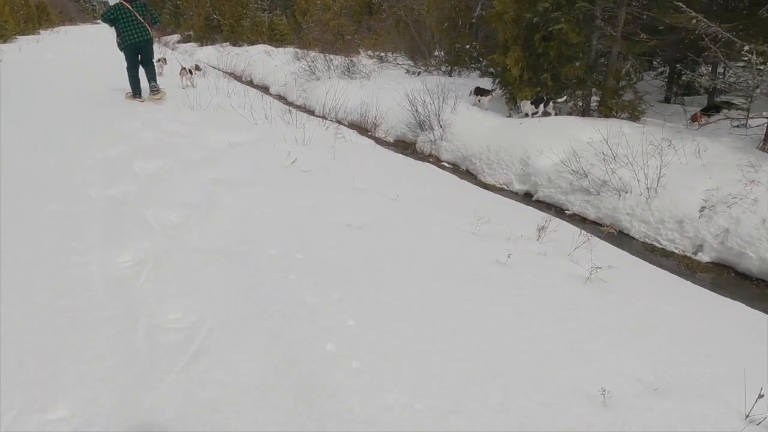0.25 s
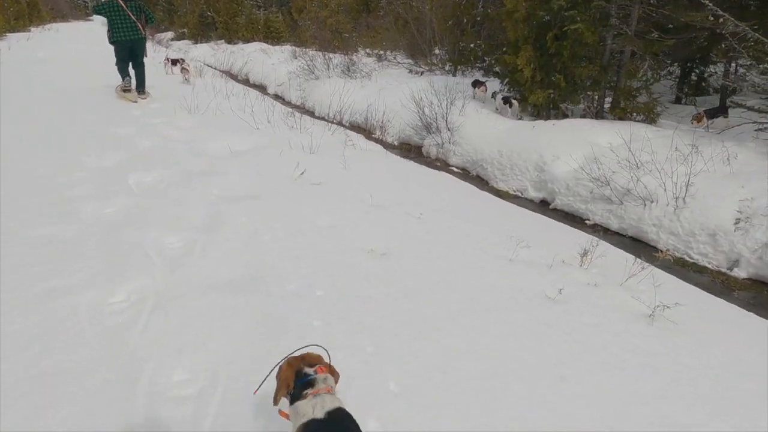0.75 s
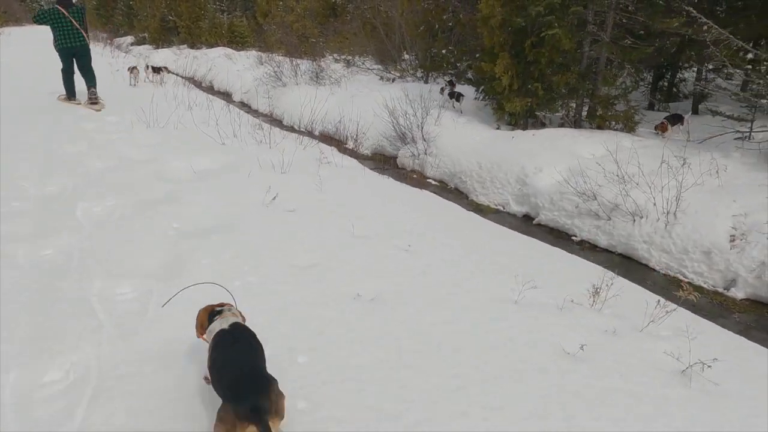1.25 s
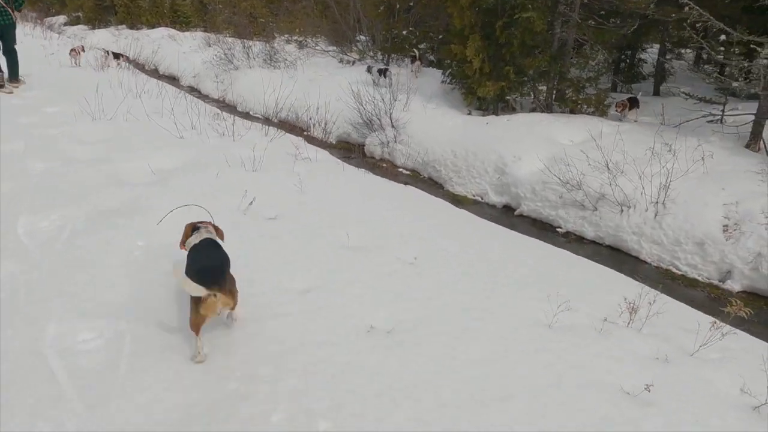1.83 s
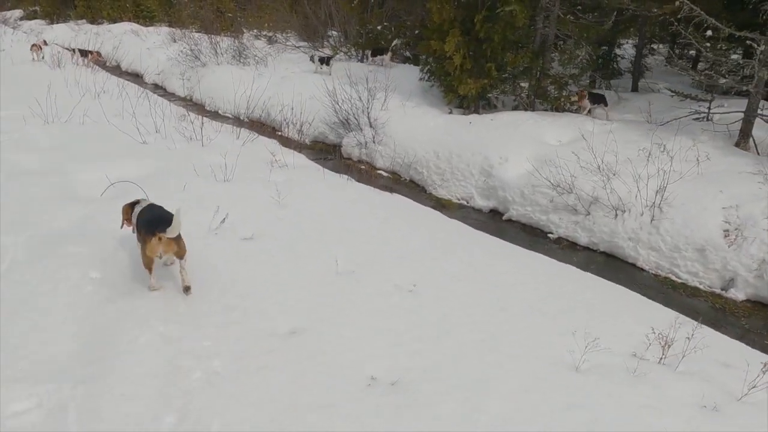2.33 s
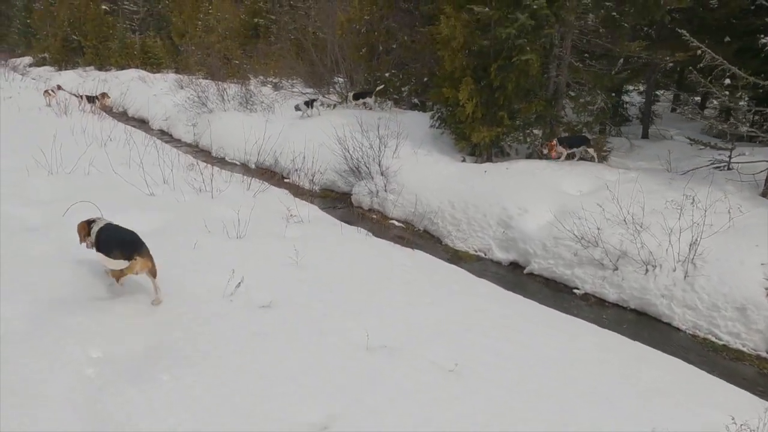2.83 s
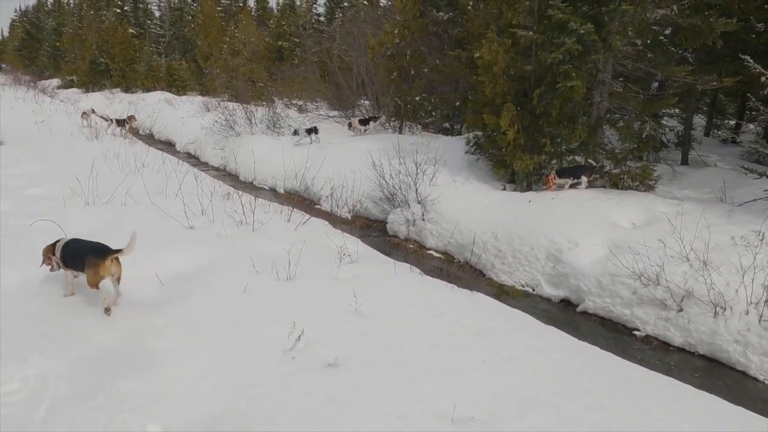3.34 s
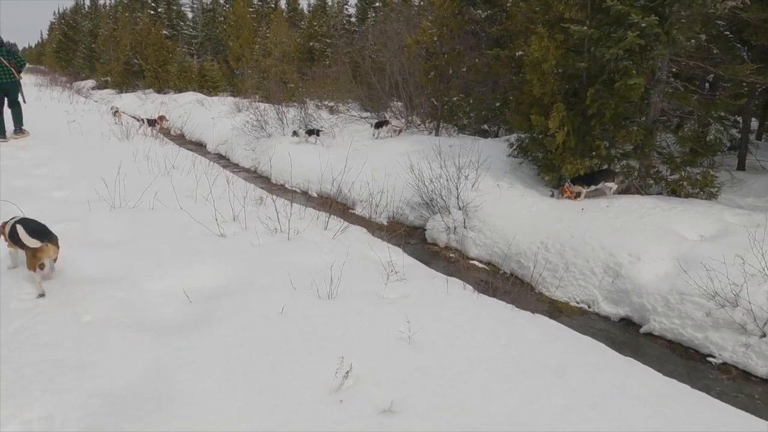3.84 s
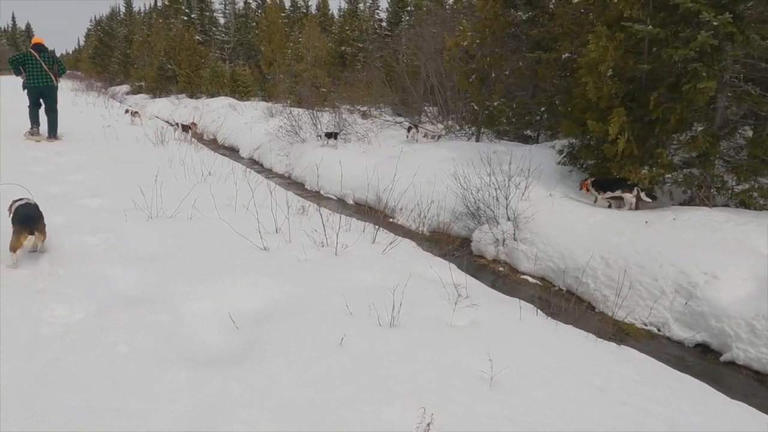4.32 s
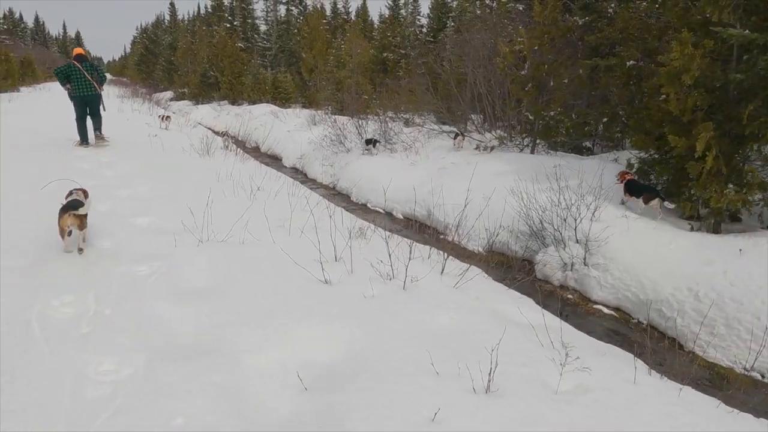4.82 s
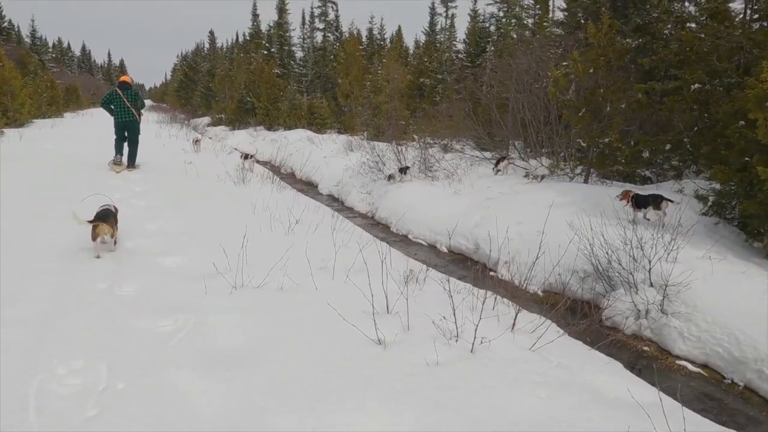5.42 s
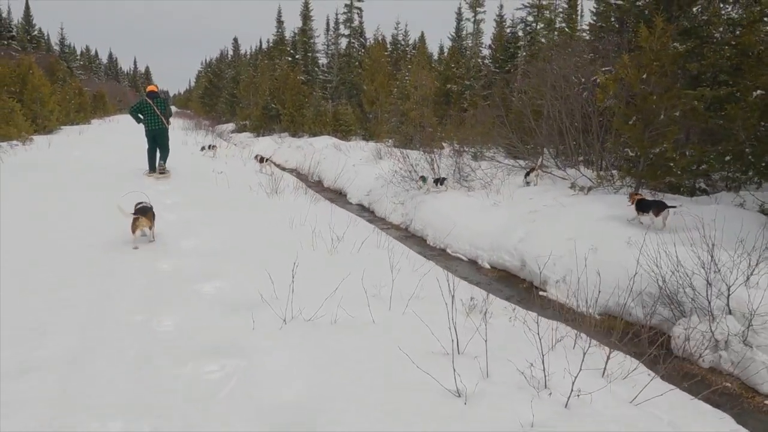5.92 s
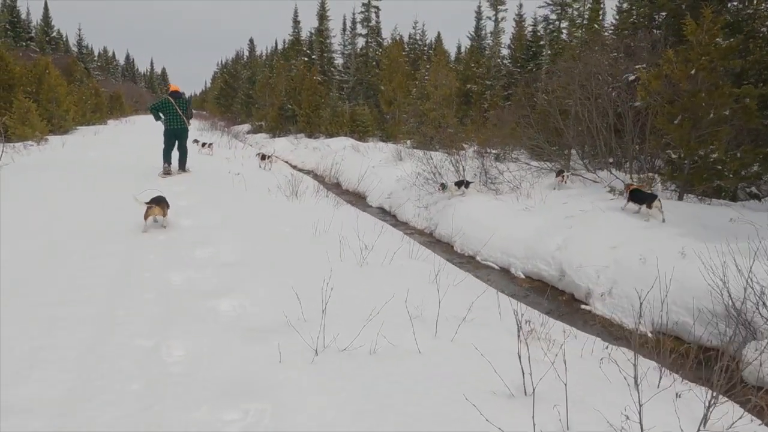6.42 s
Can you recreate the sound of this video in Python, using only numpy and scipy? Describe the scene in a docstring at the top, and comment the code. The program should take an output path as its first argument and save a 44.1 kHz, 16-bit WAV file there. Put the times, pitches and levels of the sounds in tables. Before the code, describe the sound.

Small bells jingle on trotting dogs over crunching snowshoe steps, with a light wind rumble and quiet forest air.

```python
"""From the start, snowshoes crunch, scuff and snap through crusted snow under a hand-held camera, while
light wind buffets both microphone ports over a forest hush. Clappers jingle in the collar bells of
trotting dogs: one close by, a faint pack running off, and from about 2 s a second small bell.
The packed snow squeaks twice, near 1.6 and 4.9 s. From 5.5 s the camera folds its two channels
into one, duller sound."""
import sys
import numpy as np
from scipy import signal
from scipy.fft import rfft, irfft, next_fast_len
from scipy.io import wavfile
from scipy.ndimage import uniform_filter1d, map_coordinates

SR = 44100
rng = np.random.default_rng(int(sys.argv[2]) if len(sys.argv) > 2 else 0)


def store_pcm(level_fs):
    """Save levels as 16-bit WAV."""
    pcm = np.round(np.clip(level_fs, -1, 1) * 32767).astype(np.int16)
    wavfile.write(sys.argv[1], SR, np.atleast_2d(pcm).T)


N = 293946

# tone of breaking crust: (frequency [Hz], spectrum level [dB])
CRUST_SPECTRUM = [(47, -4.5), (80, 1.5), (280, -1), (486, -4), (843, -6.5), (1050, -3), (1780, -5.5),
                  (2480, -11), (3050, -10), (4000, -7), (5470, -6.5), (10800, -31), (12900, -43.5),
                  (15400, -63)]
# main modes of the near bell and the pack's: (frequency [Hz], t60 [s], left minus right [dB])
COLLAR_MODES = [(1801.5, 0.35, -3), (4117, 0.47, 3), (5336, 0.17, 9), (6295, 0.19, -1.5), (5590, 0.15, 2.5)]
# fainter modes that ring along: (main mode [index], frequency [Hz], relative level [dB])
COLLAR_PARTIALS = [(2, 5552, -3), (4, 7365, -8), (4, 4160, -5), (4, 10010, -14), (4, 9150, -20),
                   (4, 3634, -12), (4, 13990, -33), (1, 9512, -24), (1, 10400, -27), (1, 11930, -31)]


def amp(db):
    return 10 ** (np.asarray(db) / 20)


def unit(x):
    return x / np.sqrt(np.mean(x ** 2) + 1e-20)


def along(points, hz):
    """Read (frequency [Hz], value) points on a log axis."""
    f, v = np.transpose(points)
    return np.interp(np.log(hz + 1), np.log(f + 1), v)


def curves(rows):
    """One value per sample for each column after the time."""
    s, *cols = np.transpose(rows)
    return [np.interp(np.arange(N) / SR, s, c) for c in cols]


def wobble(rate):
    """A smooth random curve, rate knots a second."""
    return map_coordinates(rng.standard_normal(int(N * rate / SR) + 4), [np.arange(N) * rate / SR])


def filtered(x, response):
    """Shape x with a complex frequency response."""
    m = next_fast_len(N + SR // 2)
    return irfft(rfft(x, m) * response(np.fft.rfftfreq(m, 1 / SR)), m)[..., :N]


def above(hz, edge_hz):
    """Gain of a soft high-pass."""
    return 1 / np.sqrt(1 + (edge_hz / (hz + 1)) ** 8)


def spread(pair, width_db):
    """A direct sound and its scattered twin reach two ports a finger apart."""
    likeness = [(100, 1), (400, 0.97), (700, 0.85), (1500, 0.77), (5000, 0.17), (8500, 0.99), (12000, 1)]  # how alike the ports sound: (frequency [Hz], correlation [0-1])
    balance = [(300, -1), (800, 2), (1500, 1), (3000, 3), (6000, 7.5), (9000, 0.5)]  # how the image leans: (frequency [Hz], left minus right [dB])
    angle = lambda hz: np.arccos(np.clip(along(likeness, hz), -1, 1)) / 2
    mid, side = filtered(pair, lambda hz: np.array([np.cos(angle(hz)), np.sin(angle(hz))]))
    side = side * amp(width_db)
    # below the top treble, the left port hears a sample later than the right
    lag = lambda hz: np.exp(-1j * np.pi * hz / SR * (1 - above(hz, 11300)))
    left = lambda hz: amp(along(balance, hz) / 2) * lag(hz)
    return filtered(np.array([mid + side, mid - side]), lambda hz: np.array([left(hz), 1 / left(hz)]))


def air():
    """A quiet, wide bed of forest and stream rustle."""
    spectrum = [(100, 5.5), (800, -5.5), (1500, -41), (2800, -20), (5000, -4.5), (9000, -17.5),
                (14000, -35), (15500, -101)]  # low murmur and high hiss: (frequency [Hz], spectrum level [dB])
    rustle = unit(filtered(rng.standard_normal((2, N)), lambda hz: amp(along(spectrum, hz))))
    return amp(-48.5) * spread(rustle, width_db=12.0)


def wind():
    """Lumpy buffeting, partly shared by the ports and stronger on the right."""
    gusts = [(0.0, -61), (0.28, -27), (0.61, -34), (0.76, -40.5), (0.8, -22.5), (1.24, -54), (1.43, -35.5),
             (2.11, -41.5), (2.78, -53.5), (2.99, -28), (3.15, -38.5), (4.15, -37.5), (4.21, -24.5),
             (4.47, -38.5), (6.55, -46)]  # push of the wind: (time [s], level [dB])
    spectrum = [(12, -28), (25, 2), (45, 3), (90, -6), (200, -20.5), (400, -62)]  # rumble at the ports: (frequency [Hz], spectrum level [dB])
    shared, own = rng.standard_normal(N), rng.standard_normal((2, N))
    rumble = unit(filtered(shared + 1.3 * own, lambda hz: amp(along(spectrum, hz))))
    return amp(curves(gusts)[0] + 3.0 * wobble(12) + np.array([[-2.6], [1.6]])) * rumble


def bell(blows, modes, partials, click_db):
    """Each clapper blow clicks, muffles the old ring and restarts every mode, a little off pitch."""
    parents = [round(k) for k, _, _ in partials]
    faint_modes = [(f, 1.17 * modes[k][1] * min(1, 7000 / f) ** 2.3, modes[k][2])
                   for k, (_, f, _) in zip(parents, partials)]
    hz, t60, pan_db = np.transpose(modes + faint_modes)[..., None]
    muffle_db = 4 * (hz / 4000) ** 1.3  # a new blow takes most from the high modes
    chance = rng.standard_normal((len(blows), 4, len(hz), 1))
    starts = [round(row[0] * SR) for row in blows] + [N]
    rattle = np.array([wobble(160) for _ in hz])  # the loose clapper and the collar brush the metal
    ring, click_env = np.zeros((2, N)), np.zeros(N)
    tail_db = np.full(hz.shape, -120.)
    for (_, *db), start, end, (phase, detune, scatter, beat) in zip(blows, starts, starts[1:], chance):
        t = np.arange(min(end - start, SR // 3)) / SR
        span = slice(start, start + len(t))
        blow_db = np.array(db + [db[k] + rel for k, (_, _, rel) in zip(parents, partials)])[:, None]
        blow_db[len(db):] -= 4 * np.abs(scatter[len(db):])
        level_db = 10 * np.log10(amp(2 * blow_db) + amp(2 * (tail_db - muffle_db)))
        tail_db = level_db - 60 * (end - start) / SR / t60
        env = amp(level_db - 60 * t / t60) * (1 - np.exp(-t / .0004)) * (1 - np.exp(-t[::-1] / .0006))
        env *= 1 + 0.23 * np.sin(2 * np.pi * 22 * beat * t + 3 * scatter)  # a dent makes each mode beat
        env *= 1 + 0.3 * np.exp(-t / 0.0055)  # the first clank fades fast
        env *= amp(1.13 * rattle[::-1, span])
        swung_hz = hz * (1 + 0.0013 * detune)  # the bell's swing shifts the pitch
        angle = 2 * np.pi * swung_hz * t + 3 * phase + 0.15 * rattle[:, span]
        skew = 0.53 + beat * hz / 20000  # phase offset at each port
        for ear, sign in enumerate((1, -1)):
            ring[ear, span] = np.sum(amp(sign * pan_db / 2) * env * np.sin(angle - sign * skew), axis=0)
        click_env[span] = amp(max(db) + click_db - 60 * t / 0.0068)
    noise = rng.standard_normal(N) + .5 * rng.standard_normal((2, N))
    clicks = filtered(click_env * noise, lambda hz: above(hz, 4200) * (1 - above(hz, 11700) ** 2) ** 2)
    return ring * amp(1.15 * wobble(45)) + clicks


def struck(blows, rim):
    """The level of each main mode for each blow, from where the clapper meets the rim."""
    best, rel_db, loss_db = np.transpose(rim)
    return [(s, low_db, *(upper_db + rel_db - loss_db * (1 - np.cos(np.radians(spot - best)))))
            for s, low_db, upper_db, spot in blows]


def pack_bells(blow_count, level_db, fade_db_per_s):
    """Faint bells jingle at random and fade as the other dogs run further off."""
    chance = rng.random((blow_count, len(COLLAR_MODES) + 1))
    times = (np.arange(blow_count) + chance[:, 0]) * N / SR / blow_count
    blows = [(s, *(level_db - fade_db_per_s * s - 16 * softness - 2.0 * np.arange(len(softness))))
             for s, softness in zip(times, chance[:, 1:])]
    return bell(blows, COLLAR_MODES, COLLAR_PARTIALS, click_db=-27)


def far_bell():
    """The second dog's bell, with a slightly lower note and sparser blows."""
    # clapper hits: (time [s], low note [dB], upper modes [dB], rim spot [degrees])
    blows = [(1.83, -25, -18, 37), (1.94, -37, -23.5, 39), (2.222, -30, -20, 14), (2.358, -31, -18, 3.3),
             (2.597, -29.5, -15.5, 30), (2.816, -26, -21.5, 18), (2.925, -24.5, -30, 43),
             (3.156, -30, -18, 28.6), (3.404, -28.5, -16, 43), (3.517, -36, -21, 343),
             (3.895, -31.5, -19, 29), (3.93, -35, -23, 49), (4.057, -27.5, -16, 33),
             (4.107, -36, -26.5, 320), (4.232, -25, -25.5, 8.2), (4.295, -25, -16, 332),
             (4.707, -20.5, -32, 7.8), (4.887, -31, -29, 14), (5.245, -35, -33, 5.25),
             (5.397, -49, -27, 194), (5.447, -33.5, -34, 60)]
    # upper modes' sweet spots: (rim spot [degrees], gain [dB], loss a quarter turn away [dB])
    rim = [(0, 0, 30), (90, 0, 30), (270, 0, 20)]
    modes = [(1773, 0.46, -8.5), (5524, 0.12, 2), (7160, 0.21, 0.5), (3520, 0.2, 4)]  # main modes: (frequency [Hz], t60 [s], left minus right [dB])
    # modes that ring along: (main mode [index], frequency [Hz], relative level [dB])
    partials = [(2, 4060, -1), (3, 6080, 0), (2, 8985, -12), (2, 9810, -21), (2, 10390, -22),
                (1, 11950, -40), (1, 13630, -36)]
    return bell(struck(blows, rim), modes, partials, click_db=-6.5)


def near_bell():
    """The closest dog's trot throws the clapper around the rim of its bell."""
    # clapper hits: (time [s], low note [dB], upper modes [dB], rim spot [degrees])
    blows = [(.008, -20, -11.5, 107), (.084, -25.5, -19, 332), (.127, -25.5, -25.5, 380),
             (.256, -25, -12.5, 135), (.395, -19.5, -32, 200), (.416, -20.5, -15.5, 129),
             (.5128, -26, -15.5, 39), (.689, -23, -15.5, 370), (.774, -19.5, -19, 206),
             (.812, -23, -15, 47), (.847, -15, -52, 310), (.92, -16.5, -27, 11), (1.075, -23.5, -19, 35),
             (1.156, -25.5, -33, 185), (1.179, -20, -22.5, 340), (1.327, -24, -23, 55),
             (1.393, -23, -31, 300), (1.473, -27, -38, 200), (1.762, -33, -29, 9.6),
             (1.784, -28.5, -28, 16), (1.863, -28, -22.5, 306), (2.041, -27.5, -31, 180),
             (2.147, -24, -15, 320), (2.392, -29, -26, 7.5), (2.449, -58, -29, 6.3),
             (2.536, -34.5, -29, 24), (2.61, -45, -26, 350), (2.722, -32, -32, 185),
             (2.776, -31, -30.5, 185), (2.800, -33, -23.5, 337), (3.2, -34.5, -25, 21),
             (3.284, -19, -15.5, 318), (3.305, -34, -23, 140), (3.343, -23, -23.5, 180),
             (3.365, -42, -26, 185), (3.381, -29, -18.5, 308), (3.441, -51, -25, 200),
             (3.477, -31.5, -19, 320), (3.54, -48, -29, 330), (3.632, -24, -23, 210), (3.86, -29, -21, 56),
             (4.11, -30, -30, 53), (4.155, -26.5, -47, 170), (4.433, -26.5, -20, 340),
             (4.524, -25.5, -20, 320), (4.613, -29, -20.5, 307), (4.653, -30, -41, 340),
             (4.824, -32, -25, 212), (4.91, -52, -23.5, 300), (5.35, -30.5, -28, 180),
             (5.525, -32.5, -32, 179.8), (5.91, -52, -34, 330), (5.985, -30, -34, 44),
             (6.008, -50, -36, 185), (6.085, -57, -31.5, 334), (6.22, -47, -34, 325),
             (6.484, -55, -35, 330)]
    # upper modes' sweet spots: (rim spot [degrees], gain [dB], loss a quarter turn away [dB])
    rim = [(306, -5, 12.5), (0, 1, 28.5), (90, 1, 24), (182, 0.7, 28)]
    return bell(struck(blows, rim), COLLAR_MODES, COLLAR_PARTIALS, click_db=-9.5)


def squeaks(attack_s=0.004):
    """Packed snow slips with a brief, unsteady tone that swells and dies."""
    slips = [(1.556, -19, 2160), (4.868, -29, 2410)]  # slips underfoot: (time [s], peak [dB], pitch [Hz])
    out, t = np.zeros(N + SR), np.arange(SR // 20) / SR
    for s, db, hz in slips:
        env = amp(db) * t / attack_s * np.exp(1 - t / attack_s)
        drift = np.cumsum(rng.normal(0, 0.1, len(t)))
        out[round(s * SR):][:len(t)] += env * np.sin(2 * np.pi * hz * t + drift)
    return out[:N]


def snaps():
    """A slab of crust breaks with a crack and a swing or two at its own pitch."""
    slabs = [(0.202, -3.5, 1130), (1.1390, -15, 870), (1.345, -10, 2400), (1.5526, -7.5, 1030),
             (1.926, -22, 894), (2.2010, -4.5, 953), (2.2058, -6, 265), (2.361, -14, 1450),
             (2.423, -18, 690), (3.0915, -5, 1510), (3.1710, -11.5, 372), (4.373, -17, 339),
             (4.731, -13, 1255), (4.842, -19.5, 900), (5.5408, -10, 3900), (5.6536, -7.5, 1010),
             (5.770, -13, 1110), (5.9603, -20, 810), (6.149, -15.5, 765), (6.096, -28, 4870),
             (6.3149, -16, 457), (6.467, -11, 4000)]  # single breaks: (time [s], level [dB], pitch [Hz])
    knock, crack, t = np.zeros(N + SR), np.zeros(N + SR), np.arange(SR // 40) / SR
    for s, db, hz in slabs:
        env = amp(db + 3.0) * hz * t * np.exp(1 - 2.49 * hz * t)
        knock[round(s * SR):][:len(t)] += env * np.sin(2 * np.pi * hz * t)
        crack[round(s * SR):][:len(t)] += amp(db - 1 - 60 * t / 0.0048) * rng.standard_normal(len(t))
    return knock[:N] + filtered(crack[:N], lambda hz: amp(along(CRUST_SPECTRUM, hz)))


def fractures(rate, spread_db, life_s):
    """Envelope of crystals that break at random moments and at widely spread sizes."""
    size = (rng.random(N) < rate / SR) * amp(spread_db * rng.standard_normal(N))
    return unit(signal.lfilter([1], [1, -np.exp(-1 / (life_s * SR))], size))


def hollows(x, depth_db):
    """Brief narrow bands stand out, as hollows in the crust ring for a moment."""
    z = signal.stft(x, nperseg=512)[2]
    patches = uniform_filter1d(rng.standard_normal(z.shape[1:]), size=3, axis=0)
    patches = uniform_filter1d(patches, size=4, axis=1)
    return signal.istft(z * amp(depth_db * unit(patches)), nperseg=512)[1][:, :N]


def scuffs(crunch):
    """The shoe skims the crust: short, thinner bursts of crunch that move no big lumps."""
    skims = [(0.024, -19, 0.019), (0.138, -19, 0.014), (0.197, -15, 0.0037), (0.446, -11.5, 0.021),
             (1.011, -17, 0.018), (1.102, -9.5, 0.013), (1.343, -15, 0.012), (1.414, -20, 0.022),
             (1.519, -10.5, 0.014), (1.743, -12.5, 0.021), (2.415, -13.5, 0.023), (3.164, -12, 0.016),
             (3.533, -16.5, 0.028), (3.914, -15.5, 0.019), (4.173, -18, 0.0058), (4.534, -13, 0.016),
             (4.864, -19, 0.015), (5.477, -18.5, 0.022), (5.58, -17, 0.017), (6.274, -27, 0.01)]  # glancing contacts: (time [s], level [dB], time scale [s])
    env = np.zeros(N)
    for s, db, scale_s in skims:
        age = np.arange(SR // 8) / SR / scale_s
        env[round(s * SR):][:len(age)] += amp(db - 2.0) * age * np.exp(1 - 2.24 * age)
    return env * filtered(crunch, lambda hz: above(hz, 790) ** 0.21)


def tread(attack_db_per_s=525, release_db_per_s=474):
    """Load on the crust and its colour, in dB: footfalls swell and sag, drags rise and fall evenly."""
    # a shoe sinks in: (touch [s], full weight [s], lift [s], level [dB], swell after touch [dB],
    # sag before lift [dB], grit [dB], body [dB], thump [dB], width [dB])
    footfalls = [(0.155, 0.295, 0.39, -26.5, 14.5, 7.5, 2.5, 4, 0, -0.5),
                 (0.793, 0.91, 1.046, -20, 12.5, 17, -2, 0, -1, -3.5),
                 (1.562, 1.661, 1.708, -23, 8.5, 7, 2, 4.5, -2.5, -3),
                 (2.11, 2.215, 2.39, -24, 8, 7, 0, 1.5, -0.8, -2.5),
                 (2.877, 2.994, 3.026, -23, 9.5, 11.5, 1, 3.5, -5, 0.5),
                 (3.046, 3.079, 3.196, -26.5, 5.5, 18, 1, 2.5, -4, 2),
                 (3.653, 3.734, 3.75, -23, 8.5, 3, 2.5, 4.5, -2.5, 1.5),
                 (3.794, 3.83, 3.92, -27.5, -0.5, 8, 2.5, 2.5, -0.5, 3),
                 (4.355, 4.44, 4.624, -25.5, 5, 14.5, 3, 2.7, 0.5, 1),
                 (4.997, 5.053, 5.08, -22.5, 5, 4.5, 2, 5.5, 3, 2.5),
                 (5.132, 5.177, 5.21, -24.5, 1.5, 2, 0.3, 2.5, 0, 6),
                 (5.244, 5.262, 5.35, -28, 2.5, 10.5, -3, 1.5, -2, 9.5),
                 (5.597, 5.745, 5.757, -26, 6, 2.5, -4, 2.5, -0.3, 0.5),
                 (5.761, 5.812, 5.865, -30, 2, 16, -7.5, -4, -3.5, -31),
                 (6.306, 6.365, 6.44, -21.5, 0.5, 3, -10.5, 1.5, -4, -23)]
    # the swinging shoe trails over the crust:
    # (middle [s], length [s], level [dB], grit [dB], thump [dB], width [dB])
    drags = [(0.648, 0.29, -38, 0, -11, -2), (1.21, 0.38, -35.5, -3.5, -4.5, 5.5),
             (1.787, 0.68, -42.5, 2.5, -2, -5), (2.02, 0.28, -38.5, -2, -1.5, 2),
             (2.744, 0.13, -34, -4, -1, 3), (3.5, 0.88, -40.5, -3, 3.5, 9),
             (3.922, 0.14, -36.5, 1, -3.5, 2), (4.302, 0.62, -36, 2, -2.5, 7),
             (4.812, 0.43, -39, 2.5, 2, 8.5), (5.33, 0.14, -38, -21, -4, 13),
             (5.916, 0.24, -41, -6, 9.5, -23), (6.116, 0.24, -37.5, -12, 4.5, -10),
             (6.495, 0.12, -32, -18, -1.5, -5), (6.63, 0.32, -40.5, -7, -2.5, -11)]
    trickle_db, trickle_width_db = -44.5, -1  # loose snow keeps settling between the steps
    t = np.arange(N) / SR
    power = np.full(N, amp(trickle_db) ** 2)
    colour_sum = np.outer([0, 0, 0, trickle_width_db], power)
    shapes = []
    for touch, full, lift, db, swell_db, sag_db, *colour in footfalls:
        edges_db = attack_db_per_s * np.minimum(t - touch, 0) - release_db_per_s * np.maximum(t - lift, 0)
        weight_db = np.interp(t, [touch, full, lift], [-swell_db, 0, -sag_db])
        shapes.append((amp(db + weight_db + edges_db) ** 2, colour))
    for middle, length, db, grit_db, thump_db, width_db in drags:
        hump = np.cos(np.pi * np.clip((t - middle) / length, -.5, .5))
        shapes.append(((amp(db) * hump) ** 2, [grit_db, 0, thump_db, width_db]))
    for shape, colour in shapes:
        power, colour_sum = power + shape, colour_sum + np.outer(colour, shape)
    return 10 * np.log10(power), colour_sum / power


def steps():
    """Crust gives way: big lumps thump, small crystals grit, and some breaks shake every size at once."""
    edges = [60, 300, 800, 2200, 3300, 5000, 20000]  # grain sizes, lumps to crystals: (band edge [Hz])
    bite = [(0, 2.5), (2.7, 2.5), (3.2, -7.5), (5.4, 0), (6.2, 5)]  # level ride on the 2.2-3.3 kHz grit: (time [s], gain [dB])
    load_db, (grit_db, body_db, thump_db, width_db) = tread()
    shared = fractures(200, spread_db=4.5, life_s=0.0055)
    shared += 0.28 * fractures(130, spread_db=3.0, life_s=0.00025)  # single crystals crack sharply
    roar = 0.68 * amp(0.52 * (load_db + 29.5))  # under full weight the breaks crowd into an even roar
    m = next_fast_len(N + 8192)
    hz, spectrum = np.fft.rfftfreq(m, 1 / SR), 0
    band_gains_db = [thump_db, 0, body_db, grit_db + curves(bite)[0], grit_db, grit_db]
    for lo, hi, gain_db in zip(edges, edges[1:], band_gains_db):
        own = fractures(60 + 0.015 * lo, spread_db=5.5, life_s=1.5 / lo)
        env = (roar + .5 * shared + 0.22 * own) / (roar + 1) * amp(gain_db)
        band = np.sqrt(above(hz, lo) ** 2 - above(hz, hi) ** 2)
        spectrum = spectrum + rfft(env * rng.standard_normal((2, N)), m) * band
    grains = irfft(spectrum * amp(along(CRUST_SPECTRUM, hz)), m)[:, :N]
    crunch = spread(unit(hollows(grains, depth_db=2.5)), width_db)
    return amp(load_db + 3.5) * crunch + scuffs(crunch)


def scene():
    """Bells and snowshoes over wind and forest air, in stereo."""
    bells = near_bell() + far_bell() + pack_bells(blow_count=56, level_db=-30, fade_db_per_s=1.3)
    return bells + steps() + snaps() + squeaks() + wind() + air()


def record(dry, top_hz=15600):
    """The band-limited camera narrows the image, late on almost to mono; the narrower, the duller."""
    fold = [(0, 0.57), (5.5, 0.68), (5.75, 0.22), (6.1, 0.016)]  # stereo width: (time [s], share of the side channel [0-1])
    dull_eq = [(2500, 0), (4000, -5), (6000, -14), (8000, -6), (10500, -17.5), (12500, 0)]  # tone of the folded sound: (frequency [Hz], gain [dB])
    width = curves(fold)[0]
    mid, side = (dry[0] + dry[1]) / 2, (dry[0] - dry[1]) / 2 * width
    mid = width * mid + (1 - width) * filtered(mid, lambda hz: amp(along(dull_eq, hz)))
    return filtered(np.array([mid + side, mid - side]), lambda hz: hz < top_hz)


dry = scene()
out = record(dry)
store_pcm(out)
```